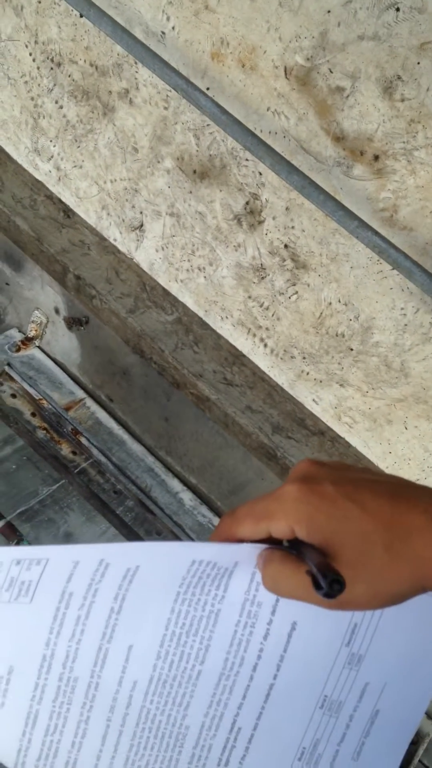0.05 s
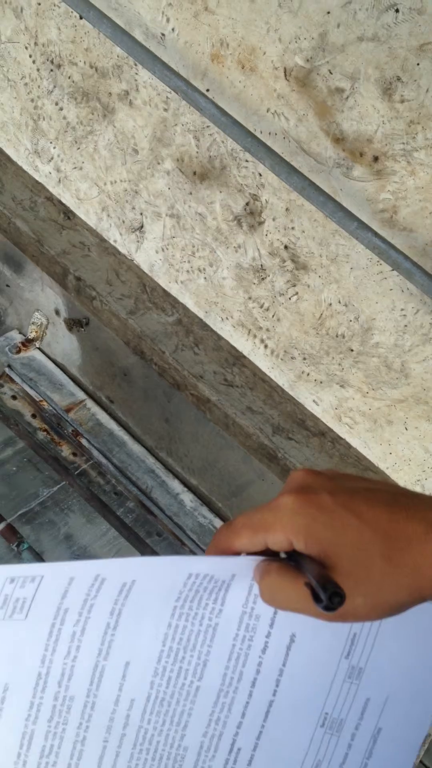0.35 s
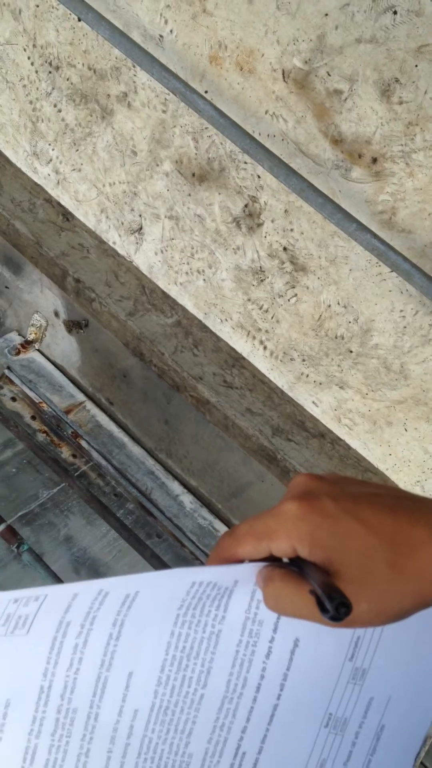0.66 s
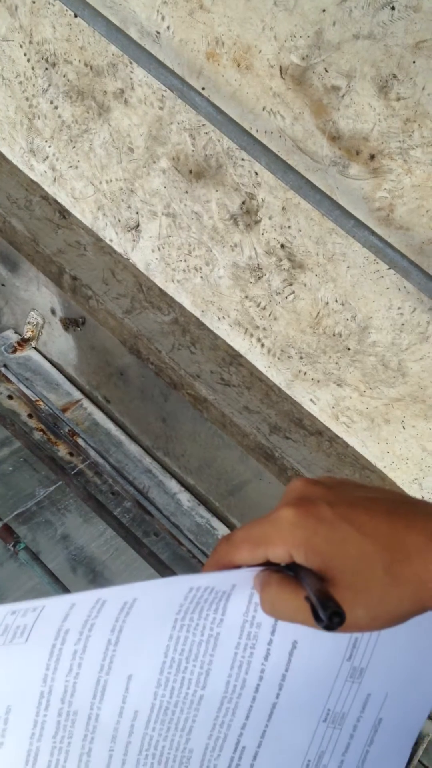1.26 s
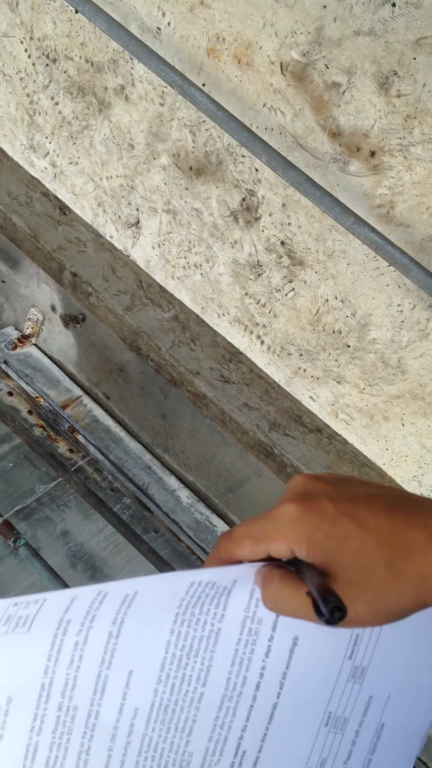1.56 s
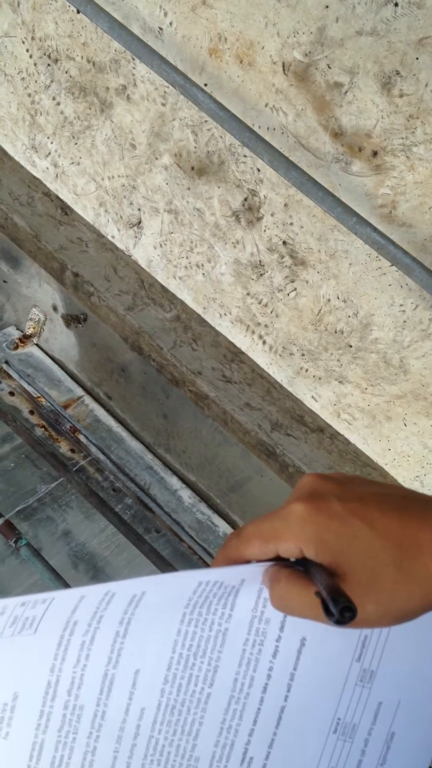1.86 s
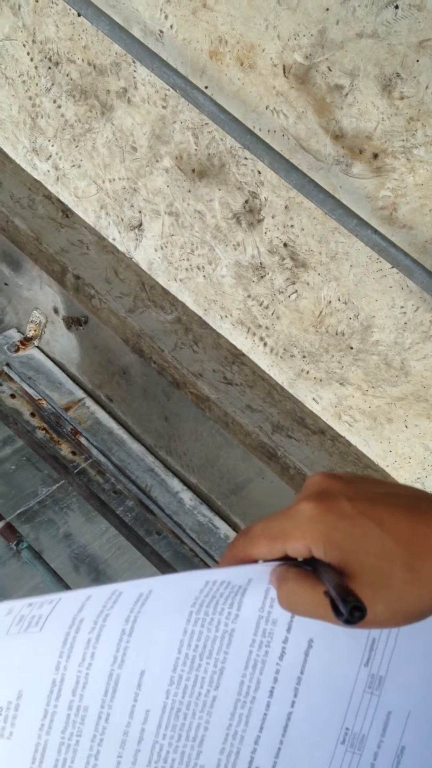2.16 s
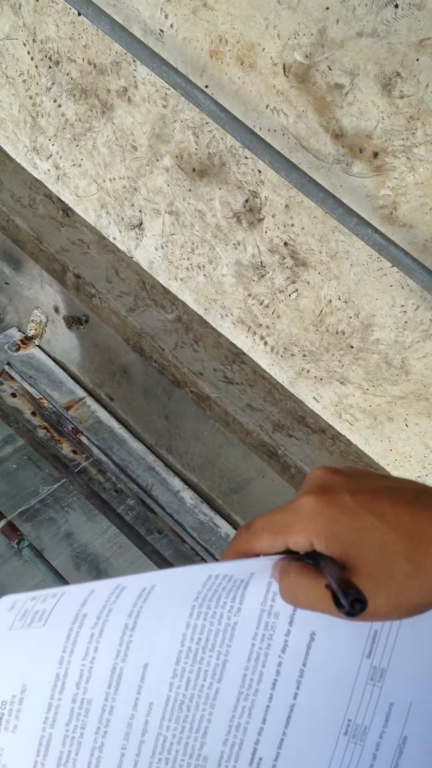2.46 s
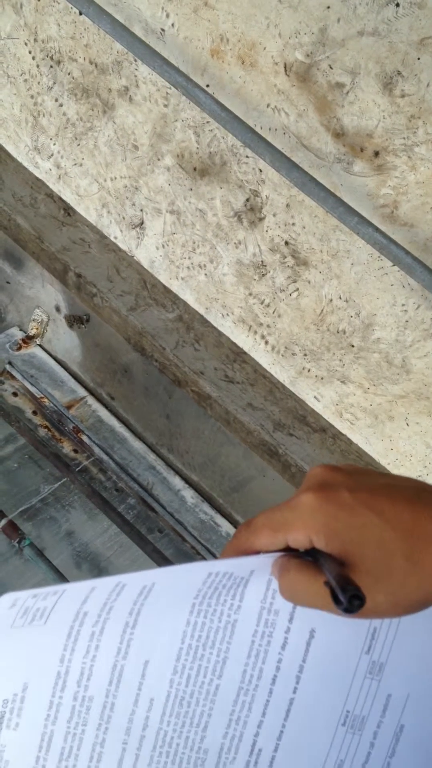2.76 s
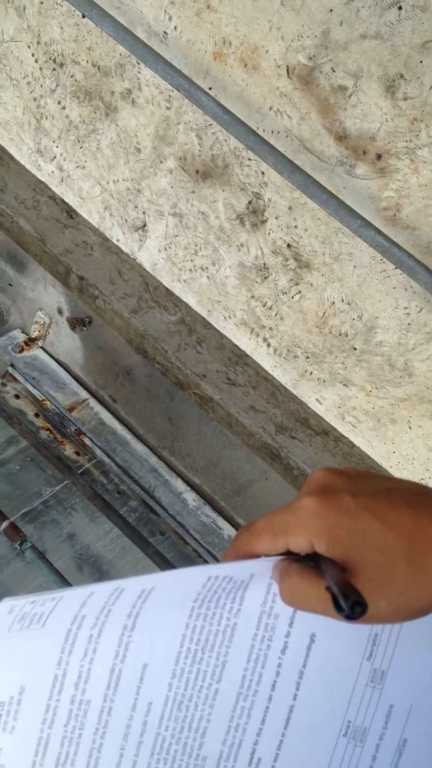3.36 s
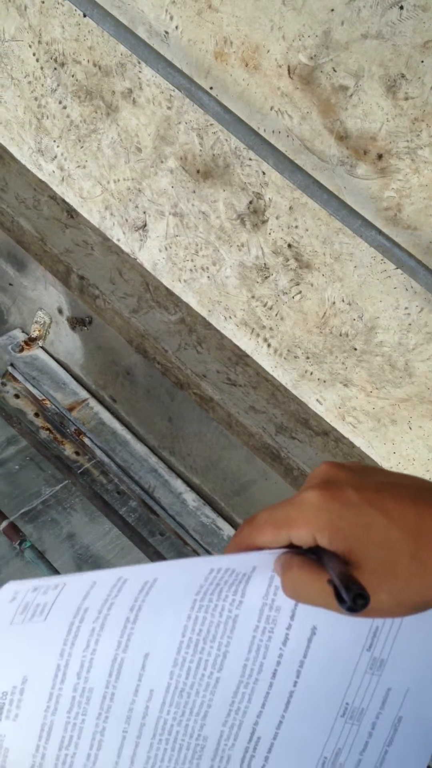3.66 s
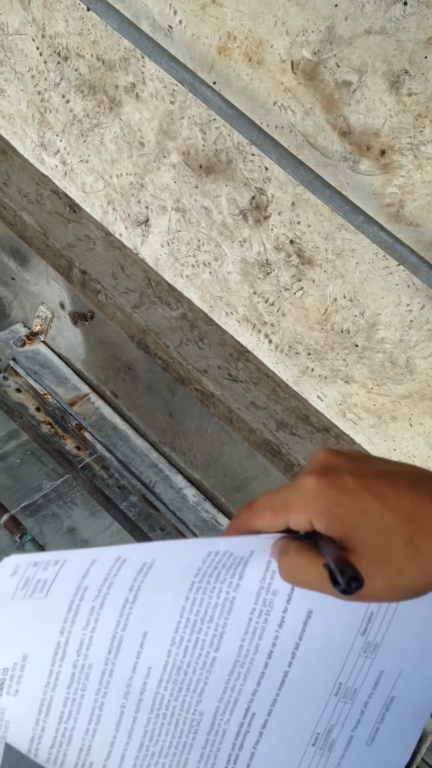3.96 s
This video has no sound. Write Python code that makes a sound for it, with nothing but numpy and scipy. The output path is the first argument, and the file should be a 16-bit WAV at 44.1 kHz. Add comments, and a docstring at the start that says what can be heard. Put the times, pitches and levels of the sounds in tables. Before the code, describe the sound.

Large rooftop fans run with a steady rush of air, a hum and faint whining.

```python
"""A wide roar of air and a strong blade hum: cooling tower fans running steadily on a roof, in mono.
Motor and gear tones whine and beat against each other, with a thin whirr from the bearings.
Underneath, the turbulent draught rumbles unevenly and comes in soft buffets. There is one light knock,
and a few faint chirps, perhaps a bird, reach the microphone from far off, echoed by the walls."""
import sys
import numpy as np
from scipy import signal
from scipy.fft import rfft, irfft, next_fast_len
from scipy.io import wavfile
from scipy.ndimage import map_coordinates

SR = 44100
rng = np.random.default_rng(int(sys.argv[2]) if len(sys.argv) > 2 else 0)


def output_pcm(signal):
    """Save a mono or channel-first signal as 16-bit PCM at the path in sys.argv[1].

    Samples are clipped to [-1, 1] before scaling.
    """
    pcm = np.clip(np.atleast_2d(signal).T, -1, 1) * 32767
    wavfile.write(sys.argv[1], SR, np.round(pcm).astype(np.int16))


N = 176400  # 4 s


def amp(db):
    """Decibels to gain."""
    return 10 ** (np.asarray(db) / 20)


def along(points, hz):
    """Read (f/Hz, value) points at hz, on a log frequency axis."""
    f, values = np.transpose(points)
    return np.interp(np.log(hz + 1), np.log(f + 1), values)


def curve(points):
    """Join (t/s, value) points into one value per sample."""
    return np.interp(np.arange(N) / SR, *np.transpose(points))


def wobble(per_s):
    """A smooth random curve of about unit size, with per_s knots a second."""
    knots = rng.standard_normal(int(N * per_s / SR) + 4)
    grid = np.linspace(0, N, 2000)
    smooth = map_coordinates(knots, [grid * per_s / SR])
    return np.interp(np.arange(N), grid, smooth)


def filtered(x, response):
    """Filter x by a gain given as a function of frequency."""
    size = next_fast_len(N + SR // 2)
    hz = np.fft.rfftfreq(size, 1 / SR)
    return irfft(rfft(x, size) * response(hz), size)[:N]


def rush(colour):
    """Noise of rms 1, shaped by (f/Hz, relative level/dB) points."""
    noise = filtered(rng.standard_normal(N), lambda hz: amp(along(colour, hz)))
    return noise / np.sqrt(np.mean(noise ** 2) + 1e-20)


def tone(cycles):
    """A sine of rms 1 that starts anywhere in its cycle."""
    return np.sqrt(2) * np.sin(2 * np.pi * (cycles + rng.random()))


def shaft_time(drift=0.0003006):
    """Seconds as kept by a shaft whose speed drifts slightly."""
    return np.cumsum(1 + drift * wobble(per_s=2.995)) / SR


def air_roar():
    """Air rushes through the tower: a wide, nearly even roar across the roof."""
    # spectrum of the rushing air (f/Hz, relative level/dB)
    roar_colour = [(30, -12), (100, -5.5), (200, 2), (320, 5), (400, -2), (500, -2), (600, -8), (800, -5.5),
                   (1080, -6.5), (1400, -8), (1950, -10), (2250, -14.5), (2700, -16), (3400, -17.5),
                   (4300, -22), (5700, -23), (7300, -27.5), (8800, -27.5), (10800, -31.5), (12500, -32.5),
                   (15400, -38.5)]
    level_db = -39 + 0.67 * wobble(per_s=14)
    return amp(level_db) * rush(roar_colour)


def blade_hum(pitch_hz=292.8, flutter_db=1.5):
    """The fan blades' hum flutters in the draught; it sinks once, near 1.5 s, and recovers."""
    # course of the hum at the microphone (t/s, level/dB)
    hum_course = [(0, -37.5), (.4, -37), (.65, -37), (.72, -38), (.85, -37.5), (1.25, -40), (1.43, -36),
                  (1.5, -37.5), (1.54, -54), (1.61, -51), (1.73, -38.5), (1.86, -41), (2.15, -34),
                  (2.3, -38), (2.5, -35.5), (2.8, -39.5), (3.4, -35.5), (4, -38)]
    # partials of the hum (multiple of the pitch, relative level/dB)
    partials = [(.5, -17.5), (1, -1), (2, -31)]
    cycles = pitch_hz * shaft_time()
    level_db = curve(hum_course) + flutter_db * wobble(per_s=21.98)
    return amp(level_db) * sum(amp(db) * tone(k * cycles) for k, db in partials)


def draught(lift_db=0.5, lump_db=0.9):
    """The turbulent draught rumbles unevenly and reaches the microphone in short, soft buffets."""
    # spectrum of the turbulence (f/Hz, relative level/dB)
    rumble_colour = [(20, -33), (35, -19), (50, -6), (80, 0), (130, -0.5), (190, 0), (245, -4.5),
                     (330, -10), (550, -27.5), (1500, -58)]
    # rise and fall of the rumble (t/s, relative level/dB)
    rumble_course = [(0, -40), (.3, -36.5), (.62, -37.5), (.8, -39.5), (1.05, -41), (1.3, -41.5),
                     (1.45, -46), (1.62, -44), (1.94, -43), (2.08, -40.5), (2.23, -38), (2.42, -40.5),
                     (2.57, -44), (2.7, -40), (3.2, -38), (3.55, -45), (3.66, -38), (3.88, -40.5), (4, -36)]
    # bell-shaped buffets (centre t/s, length/s, peak level/dB)
    buffets = [(0.235, 0.037, -34), (0.67, 0.025, -34), (0.714, 0.02, -27.5), (0.952, 0.04, -31.5),
               (1.246, 0.028, -36), (1.526, 0.038, -36.5), (1.75, 0.051, -35.5), (2.285, 0.021, -29),
               (2.347, .032, -30.5), (2.646, 0.05, -42.5), (2.747, 0.024, -32.5), (2.814, 0.029, -32.5),
               (2.955, .03, -33), (3.102, 0.05, -34), (3.285, .025, -39), (3.381, 0.01, -44)]
    # spectrum of the buffets (f/Hz, relative level/dB)
    buffet_colour = [(20, -28), (35, -14), (52, -5), (85, 5.5), (140, 1), (200, -3), (280, -13), (550, -40),
                     (1500, -80)]
    t = np.arange(N) / SR
    rumble_gain = amp(curve(rumble_course) + lift_db + lump_db * wobble(per_s=14))
    buffet_gain = sum(amp(db) * np.exp(-2 * ((t - at) / length) ** 2) for at, length, db in buffets)
    return rumble_gain * rush(rumble_colour) + buffet_gain * rush(buffet_colour)


def motors_and_gears(shaft_hz=29.2, waver_db=1.1):
    """Close tones beat and waver in the moving air; the gear whines throb with each shaft turn."""
    # steady motor and gear tones (f/Hz, level/dB)
    steady_tones = [(480.5, -64), (532.3, -56.5), (697.1, -58), (704.5, -55.5), (763.1, -61),
                    (783.9, -65.5), (927.9, -62), (937.4, -62), (993, -62.5), (995.9, -62.5), (1104.3, -65),
                    (1163, -66.5), (1321.6, -66), (1394.3, -65.5), (1514.9, -60), (1529.3, -60),
                    (1694.3, -61), (1749.8, -63), (1772.3, -66.5), (1808.5, -69), (1837.8, -66.5),
                    (1889.6, -58.5), (1900.5, -64), (2007.3, -67), (2125.1, -66.5), (2159, -67),
                    (2183.3, -65), (2268.5, -65), (2757, -71), (2843, -64.5), (2861, -59), (2865.5, -68),
                    (2872.2, -66.5), (2901.6, -69), (2946, -72), (2968.6, -62.5), (3069, -73),
                    (3273.5, -70), (3332.3, -72.5), (3361.2, -71), (3561, -73), (3620, -72.5),
                    (3704.4, -72), (3763.5, -72.5), (3792.5, -71), (4106.1, -72), (4393.4, -73),
                    (4480.9, -71.5), (4854, -77), (5111.4, -73), (5641.2, -72), (5659.2, -73), (5947, -77)]
    # throbbing gear whines (f/Hz, carrier level/dB, depth of the throb)
    gear_whines = [(1045.2, -58.5, 1.1), (1057.5, -52.7, 1.05), (1896.3, -53.5, .3)]
    t = shaft_time()
    shaft = np.sin(2 * np.pi * shaft_hz * t)
    steady = sum(amp(db + waver_db * wobble(per_s=9)) * tone(hz * t) for hz, db in steady_tones)
    throbbing = sum(amp(db) * (1 + depth * shaft) * tone(hz * t) for hz, db, depth in gear_whines)
    return steady + throbbing


def bearing_whirr(turning_hz=18.04, scatter_db=2):
    """A thin metallic whirr: high multiples of one turning rate, lifted where the housing rings."""
    # mean strength of each bearing tone before the housing lifts it (f/Hz, level/dB)
    bearing_levels = [(2000, -84), (2650, -86), (3100, -80), (3600, -82), (4300, -83.5), (5300, -84.5),
                      (5850, -83), (6100, -89), (7000, -91)]
    # resonances of the housing (f/Hz, width/Hz, lift/dB)
    housing = [(3750, 50, 9), (4030, 70, 5.5), (4400, 69, 8), (5140, 54, 9), (5330, 30, 2), (5660, 72, 8.5)]
    hz = turning_hz * np.arange(110, 390)
    lift_db = sum(db * np.exp(-((hz - centre) / width) ** 2) for centre, width, db in housing)
    level_db = along(bearing_levels, hz) + lift_db + scatter_db * rng.standard_normal(len(hz))
    bins = np.round(hz * N / SR).astype(int)
    spectrum = np.zeros(N // 2 + 1, complex)
    spectrum[bins] = amp(level_db) * np.exp(2j * np.pi * rng.random(len(hz)))
    whirr = irfft(spectrum, N) * N / np.sqrt(2)
    return map_coordinates(whirr, [shaft_time() * SR], mode="wrap")  # all tones drift together


def knock(at_s=0.851, level_db=-38, t60_s=0.045):
    """One light, dry knock: a burst of noise that dies at once."""
    # spectrum of the knock (f/Hz, relative level/dB)
    knock_colour = [(300, -20), (1400, 2), (2100, 1), (2800, 0), (4200, -11), (8000, -28)]
    age = np.arange(N) / SR - at_s
    return (age > 0) * amp(level_db - 60 * np.abs(age) / t60_s) * rush(knock_colour)


def distant_chirps(jitter=0.005, octave_db=-12.5):
    """Short gliding whistles with a weak octave, far from the microphone; perhaps a bird."""
    # the chirps (start t/s, length/s, first f/Hz, last f/Hz, level/dB)
    calls = [(2.056, .018, 4150, 3750, -53.5), (2.076, .066, 3305, 3295, -53.5),
             (3.335, .052, 3350, 3540, -57), (3.678, .05, 3300, 3110, -58.5),
             (3.775, .09, 3030, 3560, -55.5)]
    track = np.zeros(N + SR)
    for start, length, first_hz, last_hz, db in calls:
        n = int(length * SR)
        hz = np.linspace(first_hz, last_hz, n) * (1 + jitter * wobble(per_s=230)[:n])
        cycles = np.cumsum(hz) / SR
        whistle = tone(cycles) + amp(octave_db) * tone(2 * cycles)
        track[int(start * SR):][:n] += amp(db) * signal.windows.tukey(n, 0.5) * whistle
    return track[:N]


def with_wall_echo(direct, echo_db=-5, t60_s=0.25):
    """The walls around the roof add a short, diffuse tail to the direct sound."""
    t = np.arange(SR // 2) / SR
    tail = rng.standard_normal(len(t)) * amp(-60 * t / t60_s)
    echo = signal.fftconvolve(direct, tail / np.linalg.norm(tail))[:N]
    return direct + amp(echo_db) * echo


def scene():
    """The tower, the knock and the far chirps at one microphone on the roof."""
    tower = air_roar() + blade_hum() + draught() + motors_and_gears() + bearing_whirr()
    return (tower + knock() + with_wall_echo(distant_chirps()))[None]


def record(dry):
    """The microphone channel passes nothing above 15.4 kHz."""
    return filtered(dry[0], lambda hz: hz < 15400)[None]


dry = scene()
out = record(dry)
output_pcm(out)
```